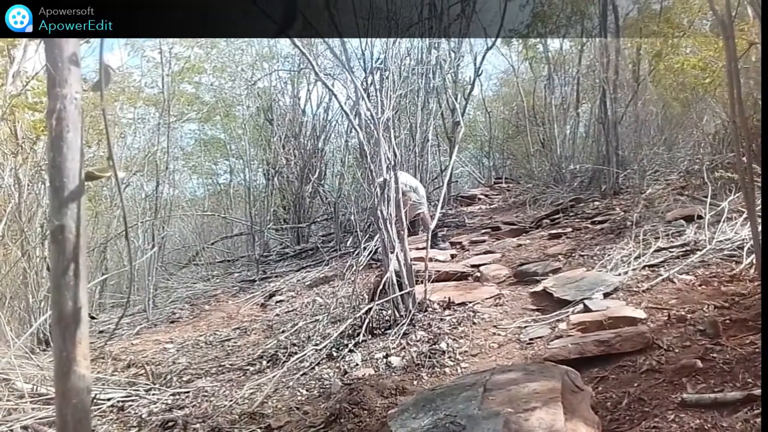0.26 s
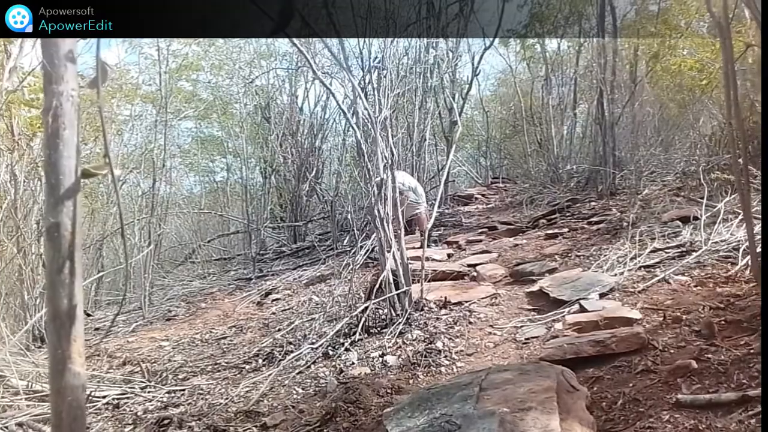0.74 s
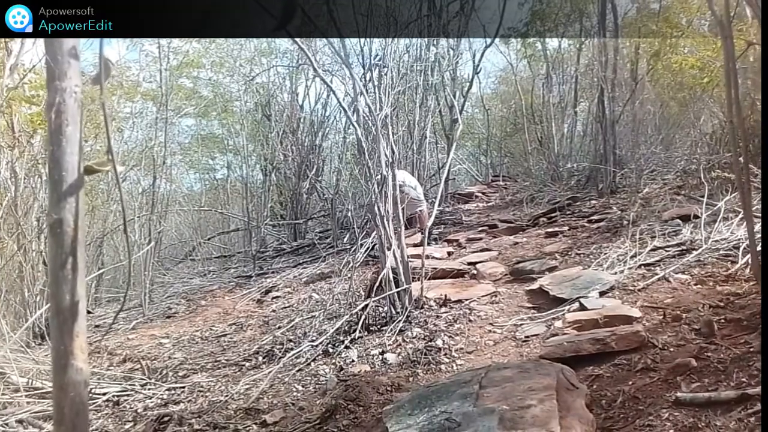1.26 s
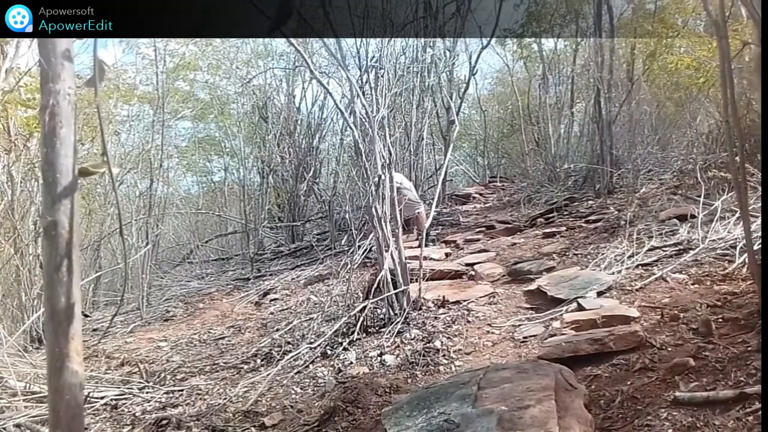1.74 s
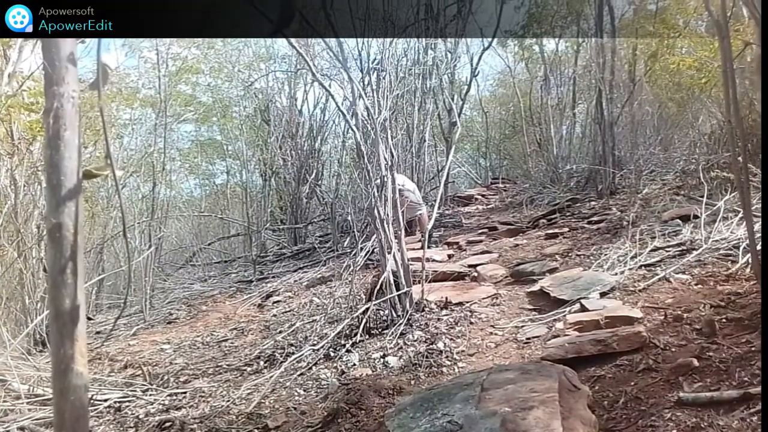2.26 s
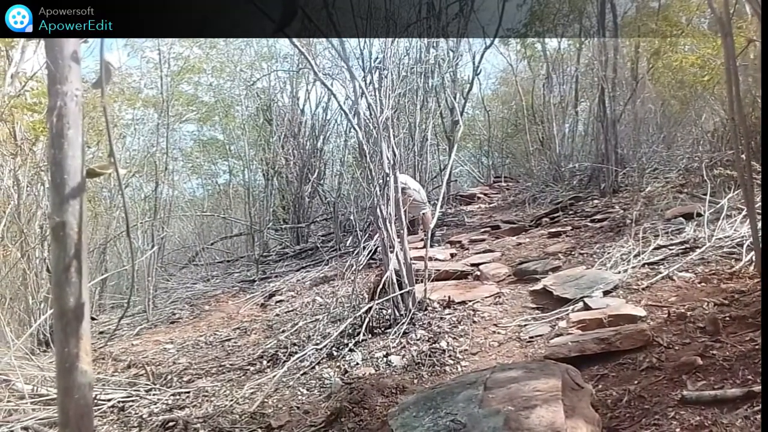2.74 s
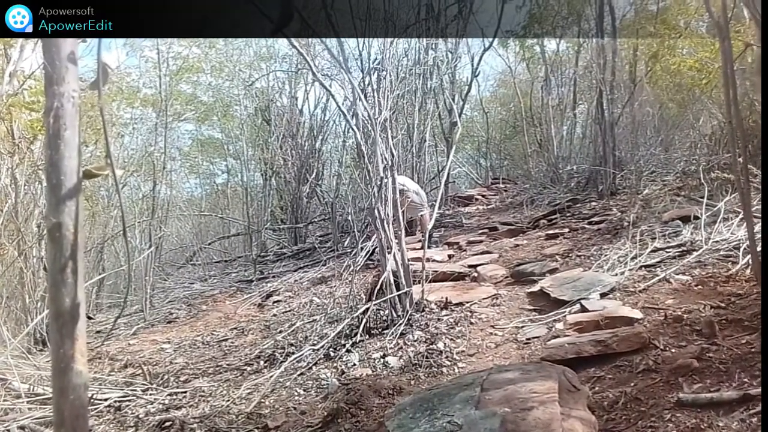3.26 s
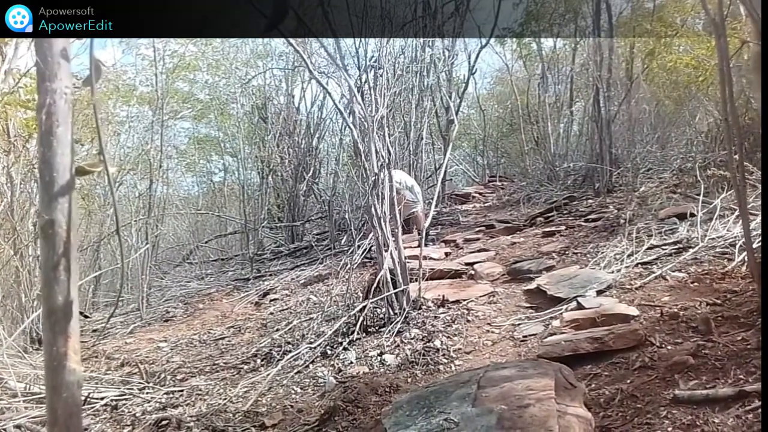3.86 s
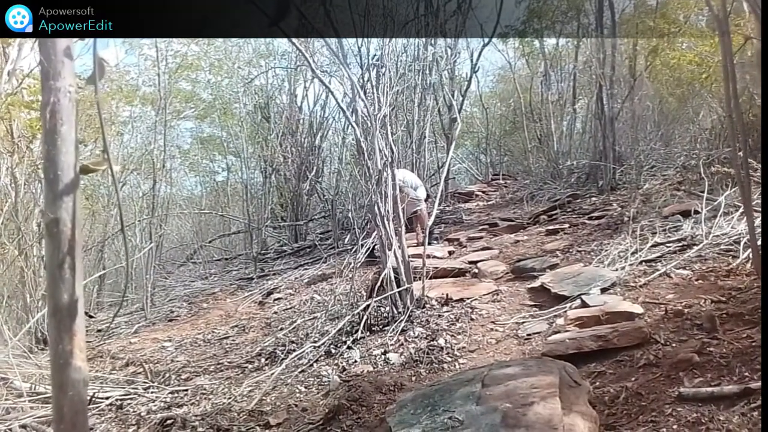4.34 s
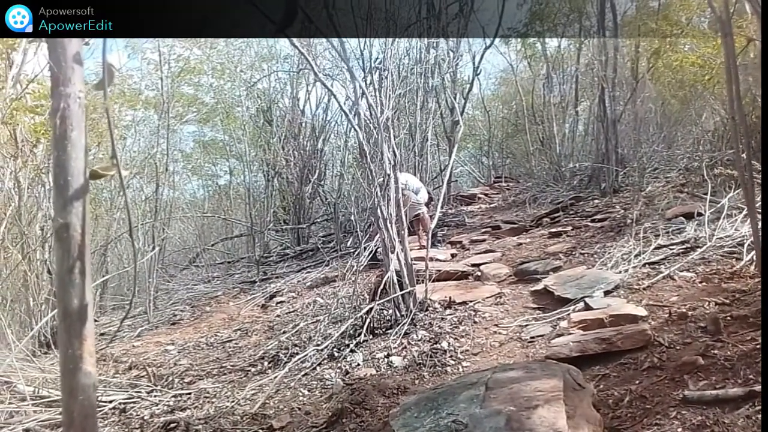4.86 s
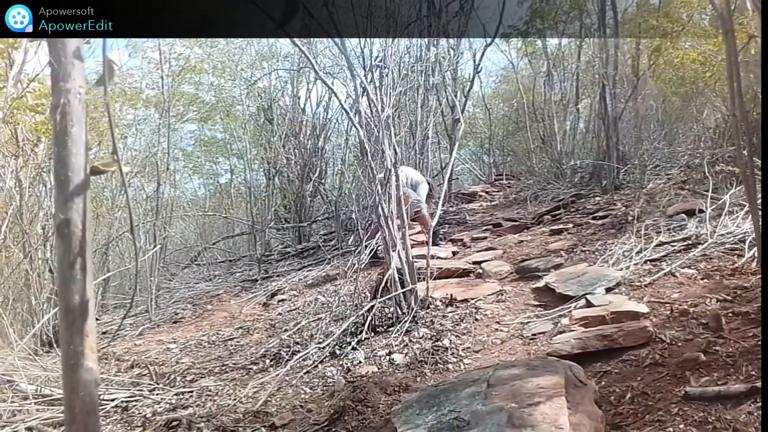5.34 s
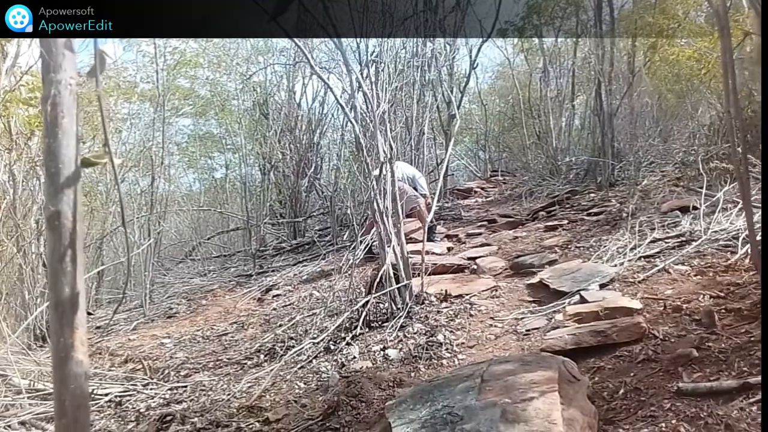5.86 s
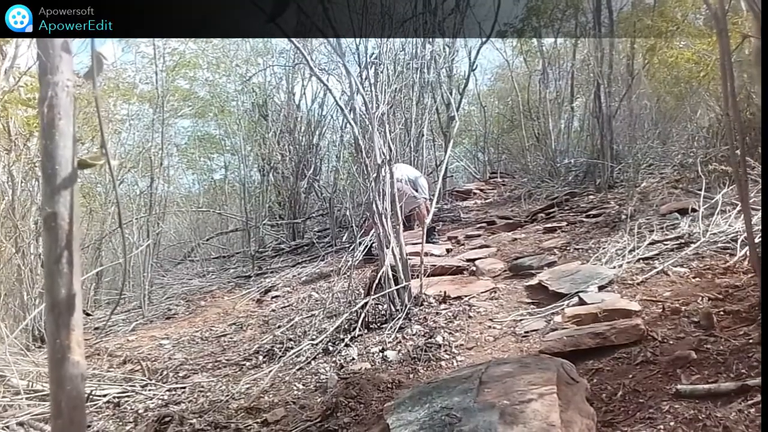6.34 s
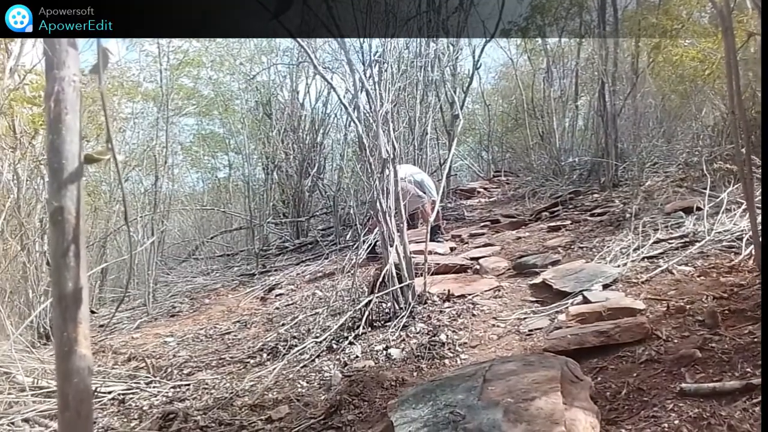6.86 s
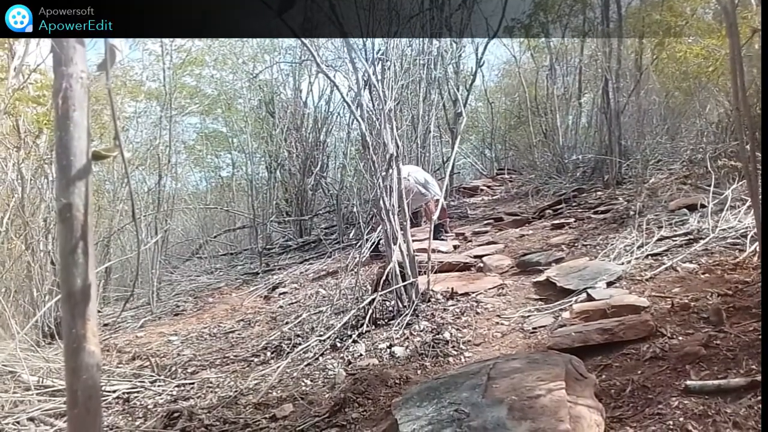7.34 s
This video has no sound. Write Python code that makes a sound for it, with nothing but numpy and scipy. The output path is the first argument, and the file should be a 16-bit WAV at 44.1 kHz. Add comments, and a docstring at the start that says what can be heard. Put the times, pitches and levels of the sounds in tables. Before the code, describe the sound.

A distant microphone outdoors hears stone slabs handled: faint grinding and dull taps, a sharp heavy knock with gritty rattle and lesser clicks, then near stillness. One mid-strength knock follows, then soft low wind bumps and dry litter snapping. A double heavy clack comes next, short and woody in its scatter from the trunks, and finally a rough low drag of stone.

```python
"""Flat stones are laid by hand on one another on a dry wooded slope, some metres away.
Each knock is modal synthesis: damped sines for the short modes of the slabs, with noise for crushed grit.
Random grit clicks excite the same modes as slabs grind; filtered clicks and noise make the dry litter.
Decaying noise scatters all this back from the trunks, along with a faint thin tone, perhaps a far bird.
Light puffs of air swing the microphone's membrane over a steady shaped-noise hiss."""
import sys
import numpy as np
from scipy import signal
from scipy.fft import rfft, irfft
from scipy.io import wavfile

SR = 44100
rng = np.random.default_rng(int(sys.argv[2]) if len(sys.argv) > 2 else 0)


def unload_wav(signal):
    """Save mono or channel-first audio to the path in sys.argv[1] as 16-bit WAV at rate SR, clipped to [-1, 1]."""
    wavfile.write(
        sys.argv[1],
        SR,
        np.round(np.clip(np.atleast_2d(signal).T, -1, 1) * 32767).astype(np.int16),
    )


def undo_db(level):
    """Turn decibels back into plain size, where 20 dB means ten times bigger."""
    steps = np.asarray(level, float) / 20
    return 10 ** steps


N = 335601


def rms_one(x):
    """Normalisation: scale a signal to rms 1."""
    return x / np.sqrt(np.mean(x ** 2) + 1e-20)


def gain_in_time(tables, axis):
    """Amplitude envelope: one dB column, straight between rows and silent between stretches."""
    now = np.arange(N) / SR
    gain = np.zeros(N)
    for rows in tables:
        rows = np.array(rows)
        gain += undo_db(np.interp(now, rows[:, 0], rows[:, axis], left=-200, right=-200))
    return gain


def ring(clicks, hz, t60):
    """Damped resonance: a two-pole filter answers a unit click with a decaying sine of height about 1."""
    radius = undo_db(-60 / (t60 * SR))
    angle = 2 * np.pi * hz / SR
    return signal.lfilter([0, np.sin(angle)], [1, -2 * radius * np.cos(angle), radius ** 2], clicks + 1e-18)


def band(x, low_hz, high_hz):
    """Band limitation: a Butterworth band-pass of order 2."""
    sos = signal.butter(2, [low_hz, min(high_hz, 0.45 * SR)], "band", fs=SR, output="sos")
    return signal.sosfilt(sos, x)


def grains(per_s, spread_db):
    """Random point process: clicks at chance moments, of uneven size and sign."""
    sizes = undo_db(spread_db * np.minimum(rng.exponential(1, N), 4)) * rng.choice([-1, 1], N)
    return sizes * (rng.random(N) < per_s / SR)


def bursts(times, level_db, t60):
    """Exponential decay: noise starts at each time and dies fast."""
    clicks = np.zeros(N)
    clicks[(times * SR).astype(int)] = undo_db(level_db)
    envelope = signal.lfilter([1], [1, -undo_db(-60 / (t60 * SR))], clicks + 1e-18)
    return rng.standard_normal(N) * envelope


# Spectrum of the hiss and far leaf murmur: frequency_hz, relative_level_db (per Hz)
AIR = [(15, -55), (25, -26), (78, -5.5), (117, -4), (217, -1), (354, -3.5), (405, -5), (840, -8.5),
       (1290, -11.5), (1400, -11), (2050, -14), (14800, -21), (16000, -20)]
AIR_DB = -55.5   # rms of the whole


def air():
    """Stationary random noise: steady hiss and far leaf murmur, coloured in the spectrum."""
    hz = np.arange(N // 2 + 1) * SR / N
    at_hz, level_db = np.transpose(AIR)
    colour = undo_db(np.interp(np.log(hz + 1), np.log(at_hz), level_db))
    spectrum = rfft(rng.standard_normal(N)) * colour
    return undo_db(AIR_DB) * rms_one(irfft(spectrum, N))


# Puffs of air on the microphone: start_s, level_db
PUFFS = [(3.68, -52.5), (3.818, -38), (4.128, -54), (4.424, -45.5), (4.569, -45.5), (4.825, -45),
         (5.201, -44), (5.341, -37), (5.366, -39), (6.469, -52)]
# One gust flutters: six puffs that swell and sink about a loudest moment
FLUTTER_START_S, FLUTTER_STEP_S = 4.665, 0.022
FLUTTER_DB, FLUTTER_TOP_S, FLUTTER_DB_PER_S = -43, 4.74, 160
# Fainter puffs come at random within a span
BREEZE_S, BREEZE_PER_S, BREEZE_DB = (3.8, 5), 4, -55


def puffs(hz=95, decay_per_cycle=3.2):
    """Heavily damped displacement: each puff pushes the membrane for about one soft low swing."""
    t = np.arange(SR // 10) / SR
    swing = np.sin(2 * np.pi * hz * t) * (t * hz) * np.exp(-t * hz * decay_per_cycle)
    beats = FLUTTER_START_S + FLUTTER_STEP_S * np.arange(6)
    beat_db = FLUTTER_DB - FLUTTER_DB_PER_S * np.abs(beats - FLUTTER_TOP_S)
    start_s, level_db = np.hstack([np.transpose(PUFFS), [beats, beat_db]])
    pushes = np.zeros(N)
    pushes[(start_s * SR).astype(int)] = undo_db(level_db)
    now = np.arange(N) / SR
    in_breeze = (now > BREEZE_S[0]) * (now < BREEZE_S[1])
    pushes += undo_db(BREEZE_DB) * (rng.random(N) < BREEZE_PER_S / SR) * in_breeze
    return -signal.fftconvolve(pushes, swing / np.abs(swing).max())[:N]


# Scatter from the trunks: band_hz, level_db, decay_t60_s
WOOD = [(125, -22.5, 0.53), (240, -18.5, 0.22), (497, -21.5, 0.29), (1000, -17, 0.34), (2190, -7, 0.38),
        (4030, -11, 0.37), (7400, -8.5, 0.33), (13000, -21, .25)]


def trunks(x):
    """Diffuse scattering: many echoes act as noise that builds up in milliseconds and dies band by band."""
    t = np.arange(SR // 2) / SR
    echo = np.zeros(len(t))
    for hz, level_db, t60 in WOOD:
        noise = band(rng.standard_normal(len(t)), hz / 1.414, hz * 1.57) * undo_db(-60 * t / t60)
        echo += undo_db(level_db) * noise * np.sqrt(2 / (t60 * SR / np.log(1e6)))   # even out decay energy
    build_up = 1 - np.exp(-t / 0.0038)
    return signal.fftconvolve(x, echo * build_up)[:N]


# A faint thin tone, perhaps a far bird: time_s, pitch_hz, level_db (rms)
TONE = [
    [(6.99, 1911, -77), (7.016, 2006, -66), (7.14, 1904, -72)],
]


def tone():
    """Phase accumulation: a nearly steady sine whose phase is the running sum of its frequency."""
    time_s, pitch_hz, _ = np.transpose(TONE[0])
    hz = np.interp(np.arange(N) / SR, time_s, pitch_hz)
    phase = 2 * np.pi * np.cumsum(hz) / SR
    return np.sqrt(2) * gain_in_time(TONE, axis=2) * np.sin(phase)


# Twig snaps: start_s, relative_level_db
SNAPS = [(4.8244, -42), (5.1574, -34.5), (5.3854, -34.5), (5.3944, -34), (5.4054, -37)]
# Dry litter rustles: loudest_s, relative_level_db, rise_s, fall_s
RUSTLES = [(5.162, -45.5, .003, 0.02), (5.25, -56.5, .12, .12), (5.404, -49.5, 0.086, 0.053)]
RUSTLE_SWING_DB = 28   # each rustle rises and falls by this much


def litter():
    """Impulsive fracture noise: leaves crackle in random clicks, twigs snap in bursts, with two bright humps."""
    swells = []
    for top_s, level_db, rise_s, fall_s in RUSTLES:
        edge_db = level_db - RUSTLE_SWING_DB
        swells.append([(top_s - rise_s, edge_db), (top_s, level_db), (top_s + fall_s, edge_db)])
    crackle = gain_in_time(swells, axis=1) * rms_one(grains(2500, spread_db=7.5))
    snap_s, snap_db = np.transpose(SNAPS)
    crackle = crackle + bursts(snap_s, snap_db - 7.0, 0.041)
    humps = 0.93 * band(crackle, 4170, 6600) + 0.5 * band(crackle, 8500, 9600)
    return humps + 0.73 * band(crackle, 860, 13000)


# Slab modes, shared by grinding and knocking: mode_hz, relative_level_db, decay_t60_s
STONE = [(64, -12, 0.13), (149.5, -8, 0.084), (192.5, 3, 0.068), (251.6, -0.5, 0.049), (359, -1, 0.065),
         (485, -3, 0.049), (597, -2.5, 0.047), (683.6, -6.5, 0.048), (914, -3.5, 0.048), (1051, 4.5, 0.017),
         (1113, -11, 0.019), (1280, -3, 0.028), (1403, -5, 0.039), (1541, -4.5, 0.04), (1770, -4, 0.024),
         (2050, -8, .012), (2400, -19.5, .016), (2780, -7, 0.014), (3425, -8, 0.023), (3840, -2, 0.005),
         (4470, -6, 0.021), (5370, -7.5, 0.0068), (5920, -6, 0.022), (6190, -2, 0.021), (9100, -3.5, .02)]
# Slabs dragged by hand, one list per stroke: time_s, low_grind_db, gritty_top_db, low_centre_hz
GRIND = [
    [(.17, -71, -81, 359), (.222, -62, -58, 484), (.3, -63.5, -74, 579), (.402, -50.5, -49.5, 910),
     (.458, -59, -81, 343), (.55, -65, -71, 701)],
    [(1.395, -59, -53, 980), (1.483, -60, -75, 286), (1.58, -57, -66, 458)],
    [(6.0, -54, -72, 343), (6.094, -55, -64, 590), (6.19, -57, -68, 622)],
    [(7.21, -63, -71, 750), (7.262, -38.5, -64, 805), (7.286, -56, -72, 770), (7.324, -44.5, -61, 770),
     (7.37, -45.5, -64, 741), (7.416, -45.5, -56, 603), (7.452, -43.5, -61, 730), (7.5, -43.5, -57, 700),
     (7.536, -53, -72, 400), (7.6, -62, -74, 540)],
]
# A slab just dropped grates as it settles: loudest_s, low_grind_db, gritty_top_db
SETTLES = [(1.625, -23.5, -28.5), (6.3, -17.5, -41)]
SETTLE_RISE_S, SETTLE_RISE_DB = 0.0055, 19.5
SETTLE_S, SETTLE_LOSS_DB, SETTLE_HZ = 0.091, 44, 350
GRIT_HZ = 3720   # centre of the gritty top


def grind(low_octaves=1.0, top_octaves=0.66):
    """Stick-slip friction: grit clicks in uneven slips excite those modes that the contact place favours."""
    settling = []
    for s, low_db, top_db in SETTLES:
        settling.append([
            (s - SETTLE_RISE_S, low_db - SETTLE_RISE_DB, top_db - SETTLE_RISE_DB, SETTLE_HZ),
            (s, low_db, top_db, SETTLE_HZ),
            (s + SETTLE_S, low_db - SETTLE_LOSS_DB, top_db - SETTLE_LOSS_DB, SETTLE_HZ)])
    strokes = sorted(GRIND + settling)
    time_s, _, _, centre_hz = np.vstack(strokes).T
    low_hz = np.interp(np.arange(N) / SR, time_s, centre_hz)
    slips = undo_db(0.88 * rms_one(band(rng.standard_normal(N), 16.0, 58)))   # swing in dB made a gain
    low = np.zeros(N)
    top = rms_one(band(grains(4000, spread_db=2.0), 1600, 8500)) * undo_db(-1.5)   # grit heard directly
    for hz, mode_db, t60 in STONE:
        rung = undo_db(mode_db) * rms_one(ring(grains(1500, spread_db=4.5), hz, t60))
        if hz < 2100:
            low += rung * np.exp(-(np.log2(hz / low_hz) / low_octaves) ** 2)
        elif hz < 7000:
            top += rung * np.exp(-(np.log2(hz / GRIT_HZ) / top_octaves) ** 2)
    low_grind = gain_in_time(strokes, axis=1) * rms_one(low * slips)
    gritty_top = gain_in_time(strokes, axis=2) * rms_one(top * slips)
    return low_grind + gritty_top


# Knocks: start_s, relative_level_db, struck_spot_hz, narrowness_db_per_octave_squared, relative_tick_db
KNOCKS = [(0.388, -29.5, 920, 10, -51), (0.44, -28.5, 120, 0.9, -71), (1.243, -33, 2500, 5, -65),
          (1.385, -47.0, 1070, 4.4, -28.5), (1.403, -30.5, 2500, 2.4, -51), (1.485, -23.5, 120, 2, -67),
          (1.506, -30.5, 120, 1.1, -43), (1.522, -33.5, 2500, 1.5, -38), (1.591, -34, 2500, 2, -53),
          (1.6046, 2.5, 240, 1.0, -11.5), (1.622, -14, 410, 13, -23), (1.736, -25.5, 720, 8.1, -51),
          (1.751, -27, 543, 6.2, -36), (1.81, -35.5, 370, 4.5, -67), (1.8798, -19.5, 840, 12, -39),
          (1.967, -31.5, 2410, 2.6, -46), (1.984, -19, 910, 11.5, -37.5), (2.0362, -35, 1840, 3.5, -49.5),
          (2.636, -38.5, 180, 1, -67), (3.725, -54.9, 2500, 1.0, -40.5), (3.738, -40.0, 2410, 2, -44),
          (3.78, -10.5, 595, 3.5, -43), (3.897, -35.5, 380, 8.8, -69), (3.962, -27, 350, 12.5, -64.5),
          (4.084, -29, 337, 12.5, -67), (4.171, -37.5, 250, 5.7, -64), (6.001, -30.5, 120, 1.5, -71),
          (6.196, -44, 2410, 0, -42.5), (6.228, -2.6, 230, 2, -21), (6.281, 2.3, 444, 4, -17),
          (6.31, -11, 120, 1.7, -42), (6.336, -22, 120, 1.7, -45), (6.565, -38, 730, 9, -54),
          (6.86, -38.9, 210, 4.5, -68.5), (7.429, -30, 180, 1.0, -38.5)]
# A small hard stone chinks: start_s, relative_level_db
CHINKS = [(.388, -43), (1.6045, -30), (1.622, -25.5), (1.854, -35), (1.8797, -32), (1.9843, -34.5),
          (3.738, -50), (6.196, -47), (6.281, -29.5)]
SLAB_HZ, TICK_HZ, CHINK_HZ = [210, 1200], 3640, 6000   # range of the slab's own ring, then tick and chink
CHINK_BELOW_TICK_DB, TICK_BELOW_CHINK_DB = 21.5, 15   # in a knock; in a chink


def strike_db(hz):
    """Modal excitation: the strength with which every knock, then every chink, reaches a mode."""
    _, level_db, spot_hz, narrow_db, tick_db = np.transpose(KNOCKS)
    slab_db = level_db - narrow_db * np.log2(np.clip(hz, *SLAB_HZ) / spot_hz) ** 2
    chink_db = np.transpose(CHINKS)[1]
    knock_parts = [slab_db, tick_db, tick_db - CHINK_BELOW_TICK_DB]
    chink_parts = [chink_db - 63, chink_db - TICK_BELOW_CHINK_DB, chink_db]
    parts = np.hstack([knock_parts, chink_parts])
    corners = np.log([SLAB_HZ[1], TICK_HZ, CHINK_HZ])
    return np.array([np.interp(np.log(hz), corners, part) for part in parts.T])


LOWS_LATE_S, LOWS_BELOW_HZ = 0.00255, 700   # the low modes follow as one push
FIRST_TOUCH_S, FIRST_TOUCH_DB = 0.0025, -18.5   # an edge grazes just before the faces meet


def knocks(spread_db=4.0, contact_s=0.002, rise_cycles=0.52):
    """Impact of rough faces: over a few ms each slab mode starts at its own moment, swells and dies."""
    start_s = np.array([row[0] for row in KNOCKS + CHINKS])
    chance = rng.random((len(start_s), len(STONE), 2))
    rung = np.zeros(N)
    for k, (hz, mode_db, t60) in enumerate(STONE):
        lag_s = min(contact_s, contact_s * hz / 900) * chance[:, k, 0]
        lag_s = lag_s + LOWS_LATE_S * (hz < LOWS_BELOW_HZ)
        size = undo_db(strike_db(hz) + mode_db - 10 + spread_db * chance[:, k, 1])
        meet_s = start_s + lag_s
        clicks = np.zeros(N)
        np.add.at(clicks, (meet_s * SR).astype(int), size * (-1) ** k)
        np.add.at(clicks, ((meet_s - FIRST_TOUCH_S) * SR).astype(int), size * undo_db(FIRST_TOUCH_DB))
        # a second, faster-dying resonance in series softens the onset
        rise_t60 = min(rise_cycles * np.log(1000) / (np.pi * hz), 0.007)
        rung += ring(ring(clicks, hz, t60), hz, rise_t60) * 2 * np.log(1000) / (rise_t60 * SR)
    knock_s, *_, tick_db = np.transpose(KNOCKS)
    crushed_grit = bursts(knock_s, tick_db - 0.5, 0.048)
    return band(rung, 119, 15000) + band(crushed_grit, 2450, 4840)


def scene():
    """Superposition: stones, litter and tone with their scatter, then puffs and hiss at the microphone."""
    far = knocks() + grind() + litter() + tone()
    return (far + trunks(far) + puffs() + air())[None]


def roll_off(x):
    """The treble ends steeply here."""
    return signal.sosfilt(signal.butter(12, 16380, fs=SR, output="sos"), x)


def record(dry):
    """Saturation and band limits: the loudest peaks are rounded; extreme treble and deep bass are cut."""
    rounded = 1.6 * np.tanh(dry / 1.6)
    top_cut = signal.sosfilt(signal.cheby2(14, 60, 16250, fs=SR, output="sos"), rounded)
    mix = signal.sosfilt(signal.butter(2, 41, "high", fs=SR, output="sos"), top_cut)
    return roll_off(mix)


dry = scene()
out = record(dry)
unload_wav(out)
```